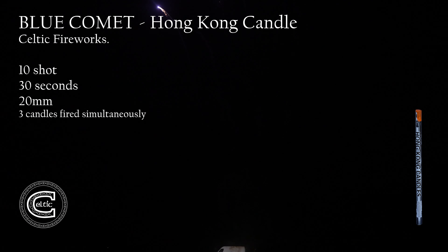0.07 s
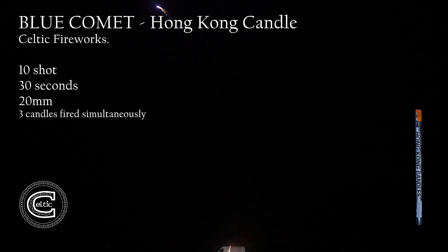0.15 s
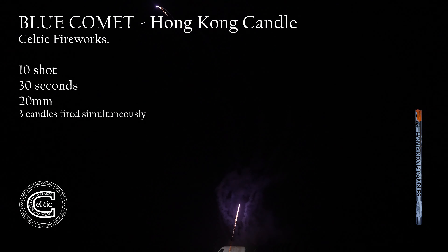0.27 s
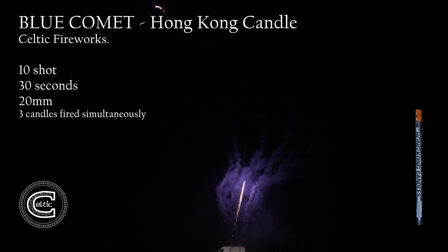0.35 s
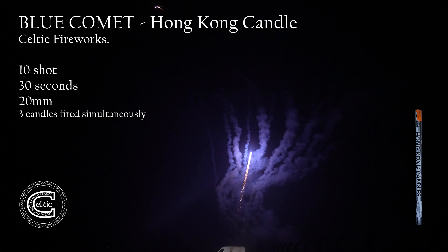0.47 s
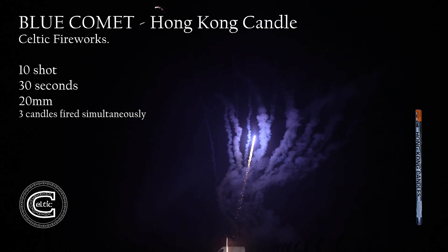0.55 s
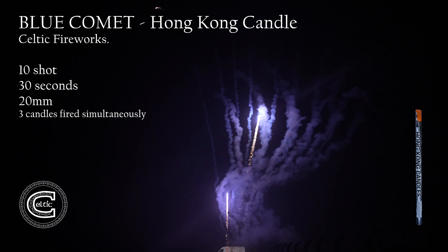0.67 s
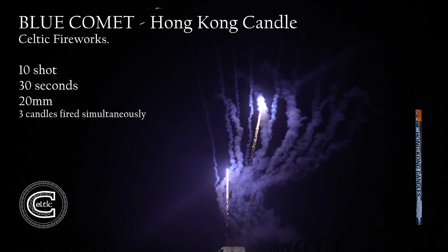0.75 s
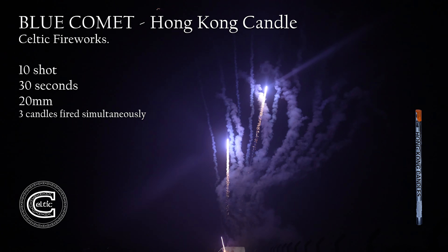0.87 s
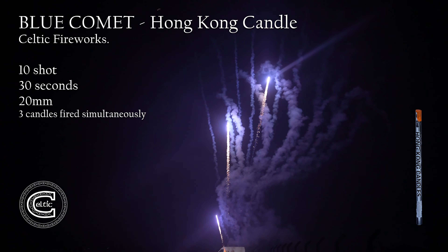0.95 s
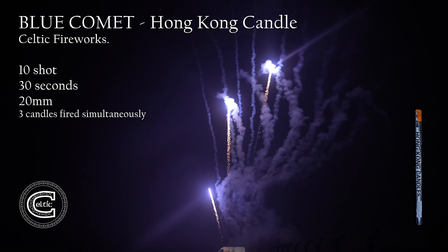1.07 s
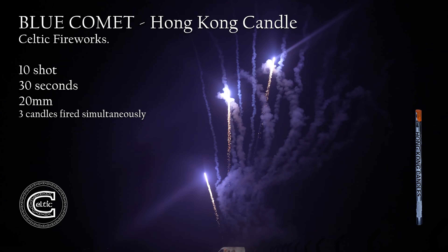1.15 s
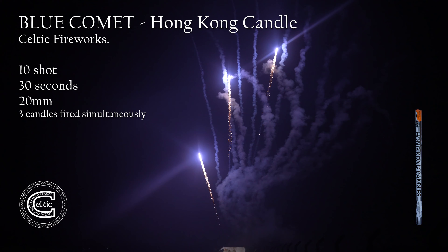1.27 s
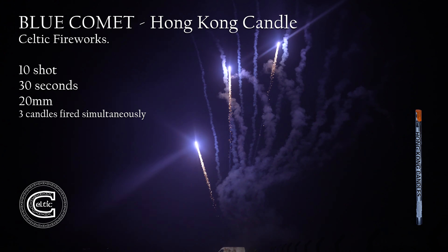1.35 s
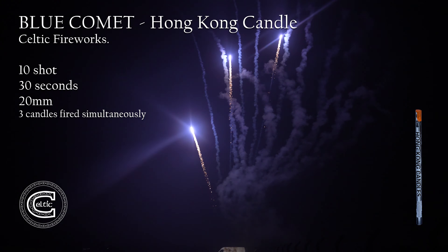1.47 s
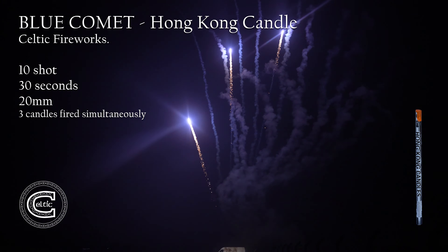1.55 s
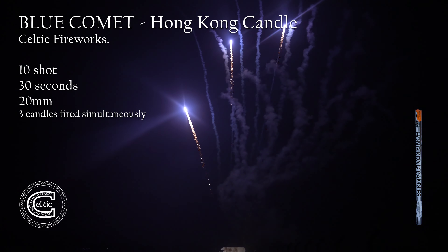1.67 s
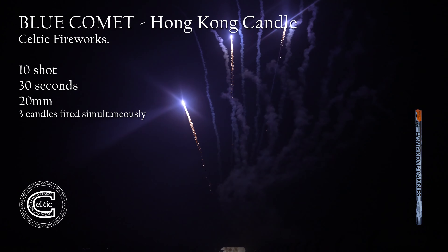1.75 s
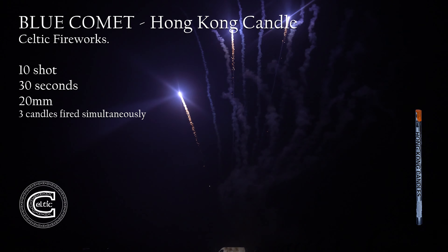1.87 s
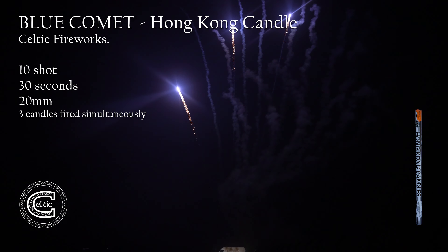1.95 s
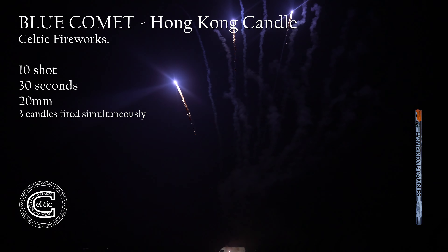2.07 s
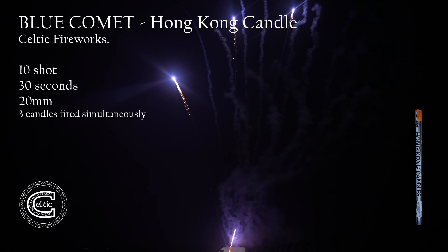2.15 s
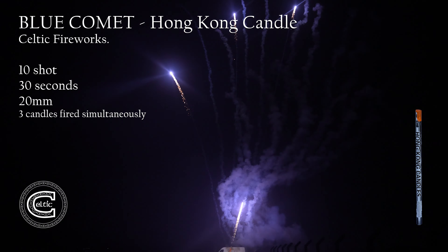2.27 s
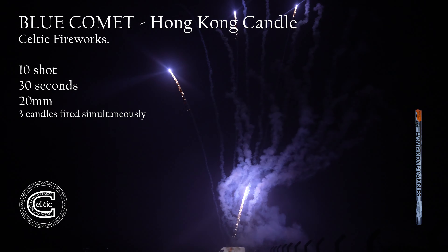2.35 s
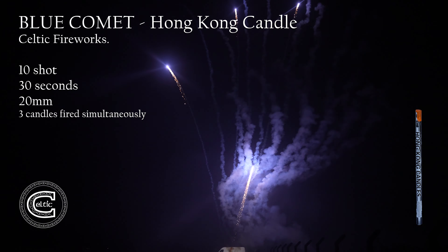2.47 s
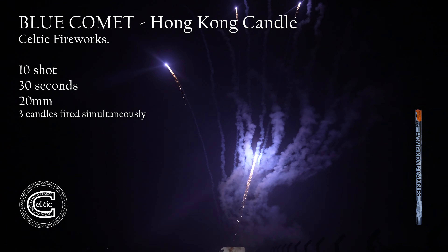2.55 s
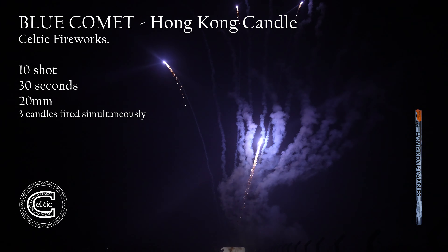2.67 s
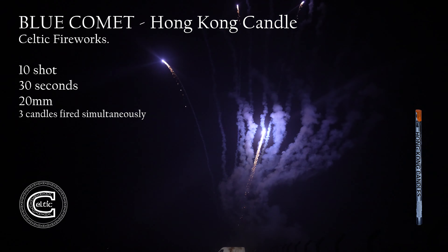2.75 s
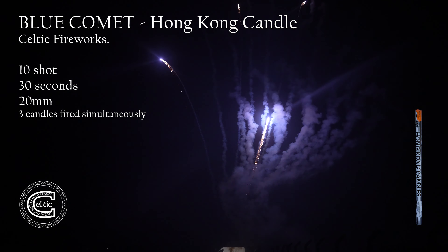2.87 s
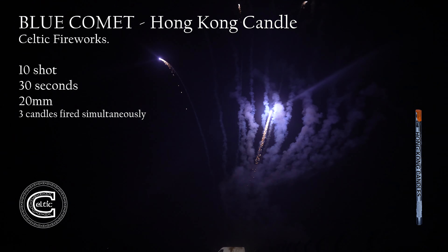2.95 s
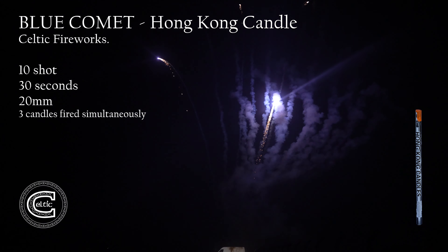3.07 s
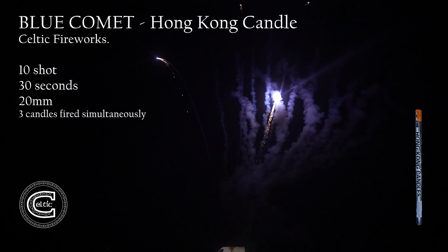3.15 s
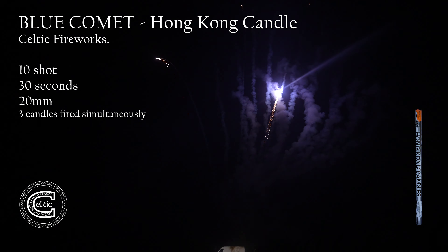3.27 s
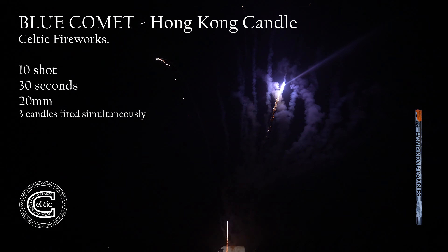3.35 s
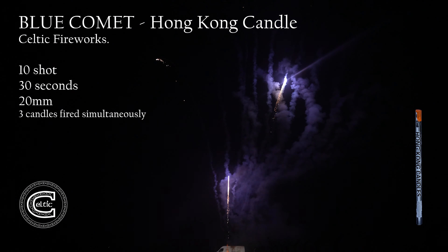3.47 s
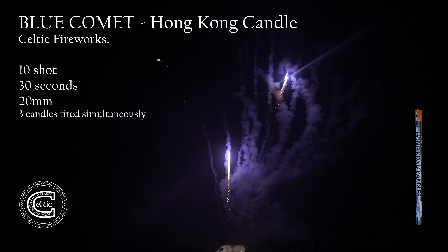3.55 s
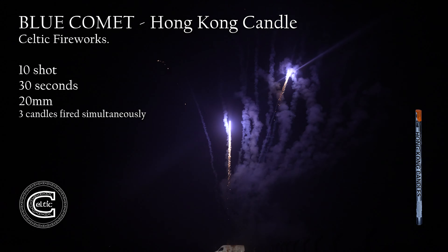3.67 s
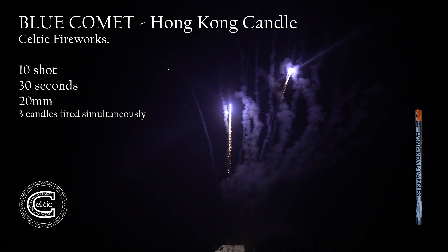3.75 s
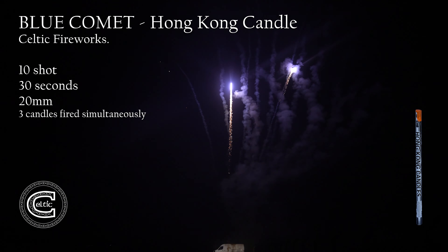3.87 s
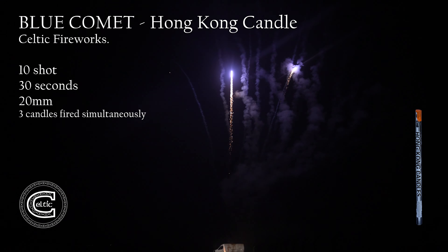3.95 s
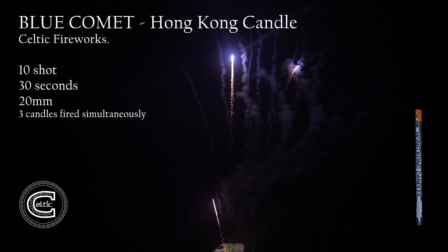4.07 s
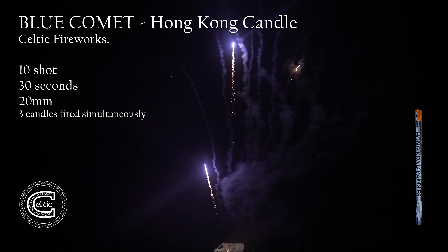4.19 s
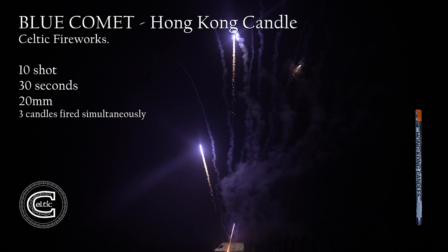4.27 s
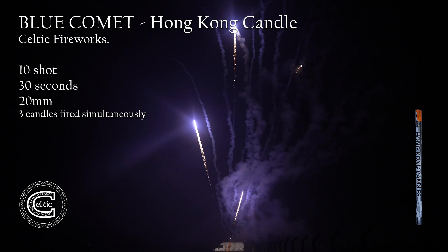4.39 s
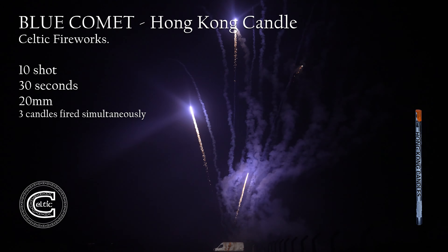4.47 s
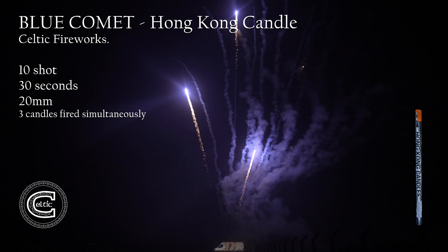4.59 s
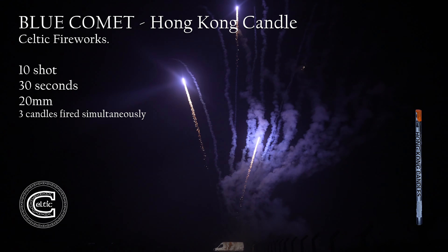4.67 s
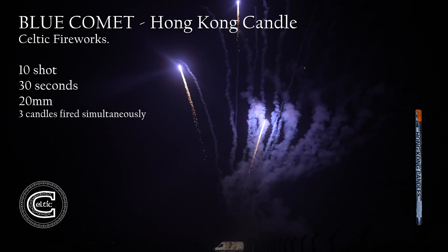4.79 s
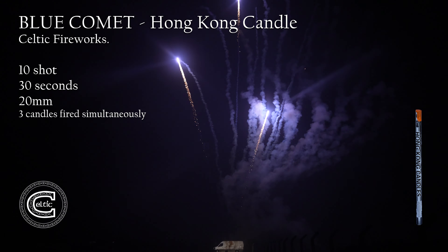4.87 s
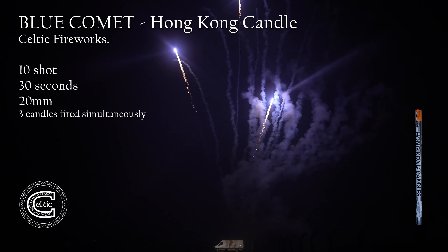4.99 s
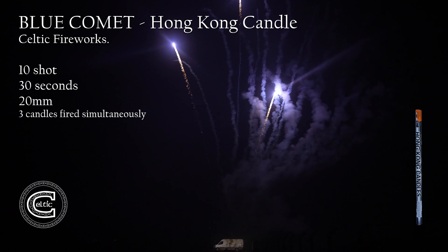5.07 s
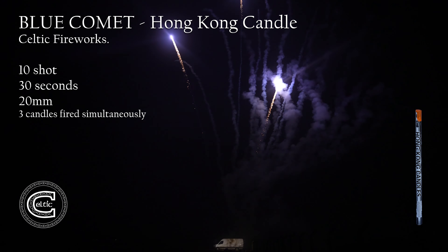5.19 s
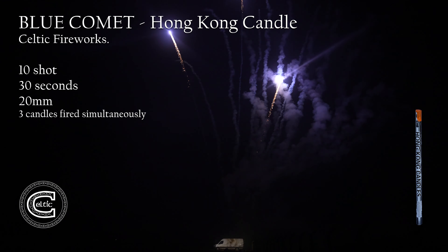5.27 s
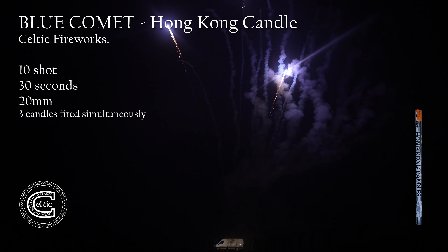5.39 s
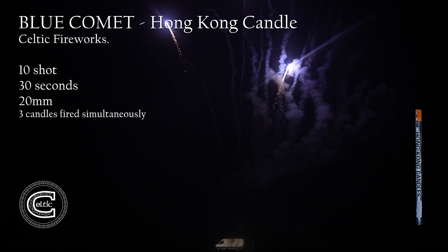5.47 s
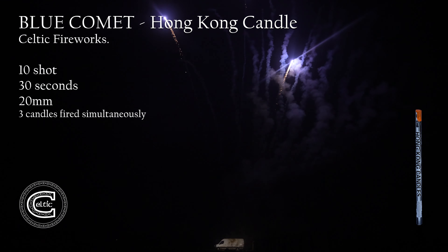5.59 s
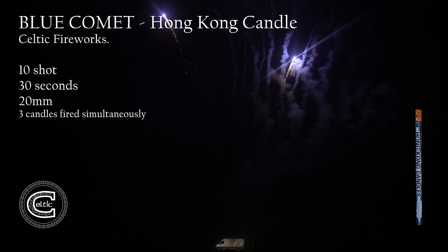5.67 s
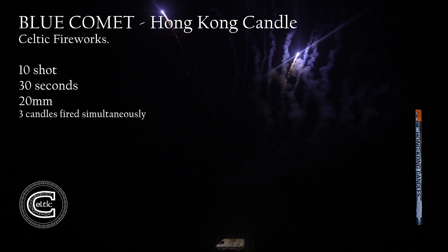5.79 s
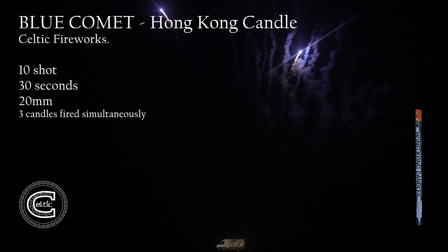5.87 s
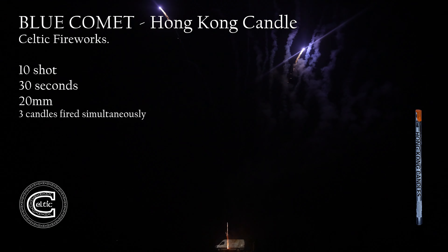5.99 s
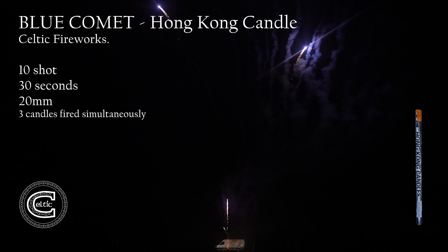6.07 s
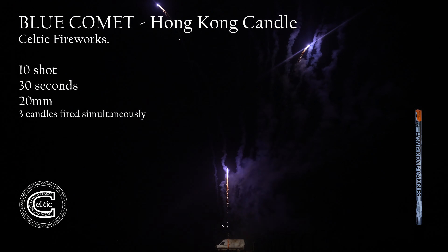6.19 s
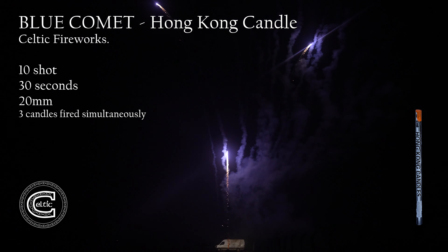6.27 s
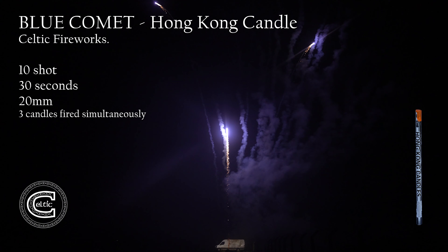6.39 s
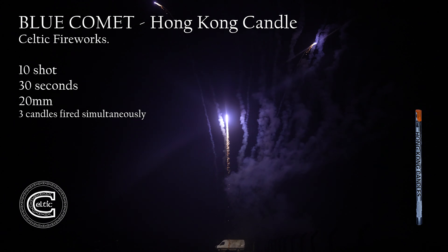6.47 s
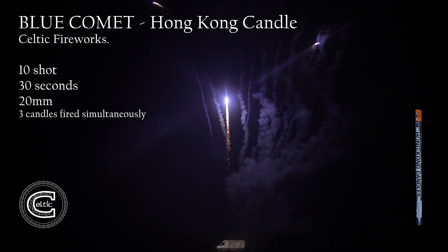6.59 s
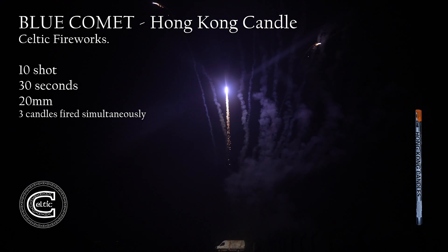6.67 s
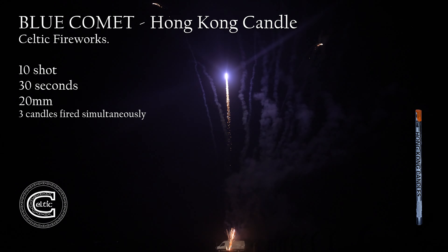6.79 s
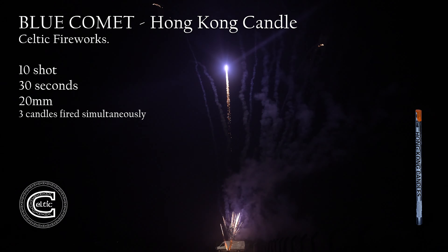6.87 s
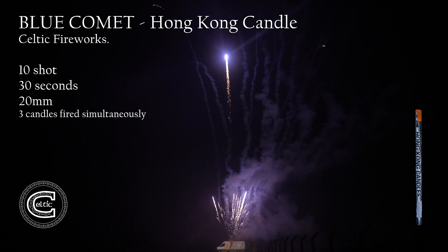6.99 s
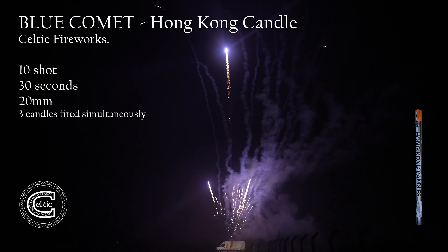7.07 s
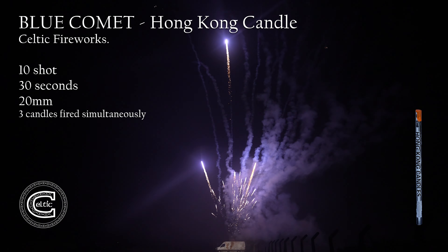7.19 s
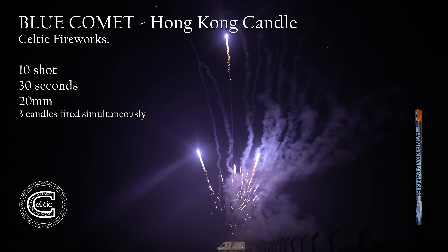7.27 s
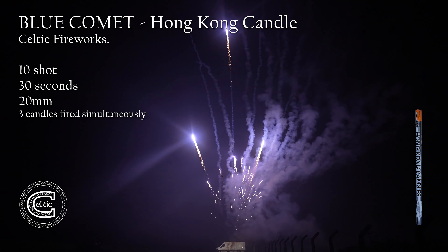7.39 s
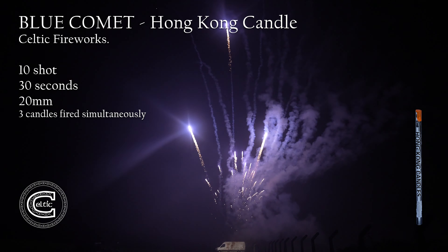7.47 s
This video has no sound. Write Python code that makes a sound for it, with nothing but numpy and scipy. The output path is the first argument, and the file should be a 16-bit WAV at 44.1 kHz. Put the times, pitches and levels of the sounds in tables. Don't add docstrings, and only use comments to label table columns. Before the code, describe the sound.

Mono outdoor night sound, with a microphone near enough to be overloaded by the shots. Faint low traffic rumble and a soft fuse fizz open the scene. At 0.4 s a hard double-edged bang cracks out, followed by others at 0.8 and 1.1 s, their echoes overlapping. Each has a dry snap, a short thump, an immediate slap from a wall, and a diffuse wash returning about a quarter second later and fading over a second or so. Climbing stars fizz thinly. A lone bang comes at 2.3 s, then shots at 3.6, 4.2 and 4.5 s, the last of these slightly weaker. Quiet hum and fading fizz follow, with one tiny tick near 5.4 s. Another bang lands at 6.2 s. Small puffs from 6.9 s lead into a ripping cluster of cracks at 7.0-7.1 s, then a lumpy, crackling roar rolls back from 7.25 s and dies away.

```python
import sys
import numpy as np
from scipy import signal
from scipy.fft import rfft, irfft, next_fast_len
from scipy.io import wavfile
from scipy.ndimage import uniform_filter1d

SR = 44100
rng = np.random.default_rng(int(sys.argv[2]) if len(sys.argv) > 2 else 0)


def wav_record(signal):
    frames = np.transpose(np.atleast_2d(signal))
    bounded = np.clip(frames, -1, 1)
    quanta = np.round(bounded * 32767).astype(np.int16)
    wavfile.write(sys.argv[1], SR, quanta)


def volts_from_decibels(level):
    exponent = np.asarray(level, float) / 20
    return 10 ** exponent


N = 332056


def evened(x):
    return x / np.sqrt(np.mean(x ** 2) + 1e-30)


def add(mix, start_s, sound):
    part = mix[round(start_s * SR):][:len(sound)]
    part += sound[:len(part)]


def coloured(x, spectrum):
    hz, db = np.transpose(spectrum)
    size = next_fast_len(len(x))
    grid = np.fft.rfftfreq(size, 1 / SR)
    gain = volts_from_decibels(np.interp(np.log(grid + 1), np.log(hz), db, -90, -90))
    return evened(irfft(rfft(x, size) * gain, size)[:len(x)])


def lumpy(length, spectrum, lump_db, lump_s):
    arrivals, lumps = rng.standard_normal((2, length))
    wander = evened(uniform_filter1d(lumps, round(lump_s * SR)))
    return coloured(arrivals * volts_from_decibels(lump_db * wander), spectrum)


def swell(t, db, build_s, hold_s, fall_db):
    t = np.maximum(t, 0)
    build = 1 - np.exp(-(t / build_s) ** 2)
    return build * volts_from_decibels(db - fall_db * np.maximum(t - hold_s, 0))


def blast(db, stretch, rise_s, dies_s):
    t = np.arange(1600) / SR / stretch
    swings = np.sin(np.pi * (t / 0.001011) ** 0.557) * np.exp(-(t / dies_s) ** 2)
    heave = 0.018 * np.hanning(len(t))
    return volts_from_decibels(db) * (swings + heave) * (1 - np.exp(-(t / rise_s) ** 2))


def crack(db, length_ms, spectrum):
    u = np.arange(1600) / SR / (0.00028 * length_ms)
    envelope = u * np.exp(1 - u)
    sound = lumpy(4096, spectrum, 2.0, 0.0011)[:1600] * envelope
    return volts_from_decibels(db) * sound / np.sqrt(np.sum(sound ** 2) / np.sum(envelope ** 2))


def lead_in(db, rumble, hiss):
    to_go = np.arange(len(rumble))[::-1] / SR
    growth = np.exp(-(to_go / 0.0077) ** 3) + 0.057 * np.exp(-to_go / 0.029)
    return volts_from_decibels(db) * (rumble + 0.15 * hiss) * growth


# [t/s, blast level/dB, blast stretch/1, crack level/dB, lead-in level/dB]
REPORTS = [(0.4147, -6.5, 0.83, -9.5, -34), (0.4169, -1.5, 0.835, -9.5, -62.5), (0.8021, 0, 1.056, -7, -43),
           (1.0968, -21, 0.66, -22, -21.5), (1.0981, -2.5, 1.025, -16, -61), (2.341, -3.5, 0.908, -20, -25),
           (3.5711, -0.5, 0.95, -8.5, -30), (4.2235, 1.5, 0.953, -8, -27), (4.4774, -8, 1.09, -15, -31.5),
           (6.2077, -1.5, 0.982, -14, -25.5), (7.005, -7.5, 1.08, -13.5, -26.5),
           (7.0165, -7, 0.58, -5, -29), (7.0321, -6.5, 0.57, -11.5, -14), (7.071, -3.5, 0.9, -15.5, -17)]
# [f/Hz, level/dB per Hz]
CRACK_SPECTRUM = [(300, -22), (1000, 3), (1900, -0.5), (2900, 5.5), (3800, 3.5), (5000, -12.5),
                  (7000, -24.5), (12000, -24), (16500, -44)]
# [f/Hz, level/dB per Hz]
GRUMBLE_SPECTRUM = [(150, -17.5), (260, -4), (380, -3), (650, -12.5), (1100, -23.5)]
# [f/Hz, level/dB per Hz]
STAR_SPECTRUM = [(300, -20), (1000, 5), (2000, -6), (3700, -5.5), (4700, -18), (5900, -14.5), (12000, -28),
                 (15000, -42), (16600, -62.5)]
STRAIGHT_PUSH_DB, STRAIGHT_CRACK_DB = 12.5, 2.5
SCATTERED_CRACK_DB = 11


def fire_shots(straight, outward, low, high):
    for s, blast_db, stretch, crack_db, lead_db in REPORTS:
        tear = crack(crack_db, 3.76, CRACK_SPECTRUM)
        rumble = lumpy(2048, GRUMBLE_SPECTRUM, 0.42, 0.00067)
        lead = lead_in(lead_db, rumble, lumpy(2048, STAR_SPECTRUM, 1.3, 0.0015))
        push = blast(blast_db + STRAIGHT_PUSH_DB, 0.926 * stretch, 0.00012, 0.0031)
        add(straight, s, push + volts_from_decibels(STRAIGHT_CRACK_DB) * tear)
        add(outward, s, blast(blast_db + 0.31, 1.027 * stretch, 0.00052, 0.0062) + tear)
        lead_s = s - 2048 / SR
        add(straight, lead_s, volts_from_decibels(3.0) * lead)
        add(outward, lead_s, volts_from_decibels(-3.5) * lead)
        add(low, s, volts_from_decibels(blast_db) * np.ones(1))
        add(high, s, volts_from_decibels(crack_db + SCATTERED_CRACK_DB) * np.ones(1))


# [t/s, level/dB, length/ms]
STAR_TEARS = [
    (7.0163, -3, 4.6),
    (7.0330, -17, 7.2),
]
# [f/Hz, level/dB per Hz]
TREE_SPECTRUM = [(300, -17), (480, 0), (750, -1.5), (1100, 2), (1600, 1.5), (2400, -8.5), (3800, -11.5),
                 (5500, -26)]


def tear_stars(straight, outward):
    for s, db, length_ms in STAR_TEARS:
        tear = crack(db, length_ms, TREE_SPECTRUM)
        add(straight, s, tear)
        add(outward, s, tear)


# [t/s, level/dB, stretch/1, spit level/dB]
LIFT_PUFFS = [
    (0.358, -44, .9, -76),
    (2.314, -43, 1.1, -62),
    (3.543, -55.5, 0.95, -60),
    (4.187, -35, 0.27, -58),
    (6.898, -36, 1, -61),
    (6.936, -29.5, 0.88, -56),
    (6.968, -24.5, 0.83, -42.5),
    (6.973, -15.5, 0.96, -52),
    (6.983, -18, 0.79, -42),
]


def puff_charges(straight, outward, low):
    for s, db, stretch, spit_db in LIFT_PUFFS:
        puff = blast(db, stretch, 0.00042, 0.0033) + crack(spit_db, 6.4, CRACK_SPECTRUM)
        add(straight, s, volts_from_decibels(2.5) * puff)
        add(outward, s, puff)
        add(low, s, volts_from_decibels(db) * np.ones(1))


def candles():
    straight, outward, low, high = np.zeros((4, N))
    fire_shots(straight, outward, low, high)
    tear_stars(straight, outward)
    puff_charges(straight, outward, low)
    return straight, outward, low, high


# [t/s, level/dB]
SHOCK_FRONTS = [(.4168, -14), (0.802, -16), (1.0987, -24), (2.341, -29), (3.5711, -7), (4.2237, -18),
                (4.477, 3), (6.2076, -28), (7.0063, -14), (7.0163, -12), (7.061, -14)]


def snaps():
    out = np.zeros(N)
    u = np.arange(100) / SR / 0.00003
    for s, db in SHOCK_FRONTS:
        add(out, s, volts_from_decibels(db) * (1 - u) * np.exp(-u))
    return out


# [delay t/s, level/dB, sign/1, low edge f/Hz, high edge f/Hz]
REFLECTORS = [(.0088, -13.5, 1, 402, 2450), (0.0113, -16.5, 1, 395, 2000), (0.0153, -22.5, 1, 400, 2034),
              (0.0152, -15.5, 1, 252.5, 2950), (.0200, -13, 1, 342, 1846), (.0230, -15.5, 1, 354, 1620),
              (0.0263, -17, 1, 300, 1610), (0.034, -20, 1, 300, 1840), (0.0433, -5, 1, 44.9, 5980),
              (0.0569, -23, -1, 30.2, 893), (0.0822, -34, -1, 60, 893), (0.1147, -25, 1, 100.5, 912),
              (0.1267, -30, 1, 50, 700), (0.2172, -23, 1, 184, 780), (0.2432, -30.5, 1, 900, 4500),
              (.2610, -33.5, 1, 201.5, 2500), (0.3624, -41, 1, 59.4, 1800), (.4000, -41, -1, 59.8, 694),
              (0.4157, -44.5, 1, 60.7, 702), (0.4692, -35, -1, 60.1, 700), (0.6165, -30, 1, 60, 2780)]


def reflections():
    path, click = np.zeros(SR), np.eye(1, 2000)[0]
    for delay, db, sign, low_hz, high_hz in REFLECTORS:
        thinned = signal.lfilter(*signal.butter(1, low_hz, "high", fs=SR), click)
        dulled = signal.lfilter(*signal.butter(2, high_hz, fs=SR), thinned)
        add(path, delay, np.sign(sign) * volts_from_decibels(db) * dulled)
    return path


# [level/dB, build-up t/s, hold t/s, fall/dB per s]
YARD_BELT = [
    (-20, 0.014, 0.01, 1101.5),
    (-16.5, 0.0056, 0.0088, 602),
    (-28, 0.0033, 0.0045, 900),
    (-45, 0.0027, 0.0035, 198),
]
HEDGE_BELT = [
    (-29, .008, 0.015, 122),
    (-44, 0.016, 0.042, 58),
    (-38.5, 0.0061, 0.055, 480),
    (-55, .008, 0.061, 800),
]
TREE_BELT = [
    (-41.5, 0.099, 0.31, 21),
    (-45.5, 0.12, 0.25, 12.5),
    (-47.5, 0.022, .03, 12.7),
    (-73, 0.026, .03, 14),
]
OPEN_GROUND = [
    (-47.5, .05, 0.11, 40),
    (-54, .05, .1, 35),
    (-53.5, .05, 0.1, 42),
    (-72.5, .05, 0.13, 36),
]
YARD_S, HEDGE_S, TREE_LINE_S = 0.0024, 0.032, 0.24


def fading(row):
    t = np.arange(2 * SR) / SR
    spread = np.minimum(TREE_LINE_S / (t + 1e-9), 1)
    yard = swell(t - YARD_S, *YARD_BELT[row])
    hedge = swell(t - HEDGE_S, *HEDGE_BELT[row])
    ground = swell(t, *OPEN_GROUND[row])
    trees = spread * swell(t - TREE_LINE_S, *TREE_BELT[row])
    return np.sqrt(yard ** 2 + hedge ** 2 + ground ** 2 + trees ** 2)


# [f/Hz, level/dB per Hz]
BOOM_SPECTRUM = [(25, -39.5), (60, -4.5), (150, 1), (260, -4.5), (500, -26.5)]
BODY_SPECTRUM = [(150, -2), (280, 3), (500, -2), (900, -10), (1500, -48)]


def low_scatter(train):
    boom = lumpy(2 * SR, BOOM_SPECTRUM, 3.0, 0.008) * fading(0)
    body = lumpy(2 * SR, BODY_SPECTRUM, 2.9, 0.0052) * fading(1)
    return signal.fftconvolve(train, boom + body)[:N]


# [f/Hz, level/dB per Hz]
HISS_SPECTRUM = [(600, -21), (1100, -1), (1900, -5), (2900, -4.5), (3900, -3), (5000, -15), (7000, -70)]
SIZZLE_SPECTRUM = [(3500, -19), (5500, 3), (8000, -4), (12500, -21), (15000, -29), (16600, -48.5)]


def high_scatter(train):
    def level(row):
        power = signal.fftconvolve(train ** 2, fading(row) ** 2)[:N]
        return np.sqrt(abs(power))

    hiss = level(2) * lumpy(N, HISS_SPECTRUM, 1.7, 0.015)
    sizzle = level(3) * lumpy(N, SIZZLE_SPECTRUM, 1.1, 0.003)
    return hiss + sizzle


# [t/s, peak level/dB]
ROAR_CLUMPS = [(7.26, -34), (7.277, -23), (7.286, -37), (7.301, -37), (7.315, -21.5), (7.323, -25),
               (7.358, -21), (7.376, -28), (7.412, -22), (7.423, -19), (7.444, -20.5), (7.46, -22)]


def roar():
    level = swell(np.arange(N) / SR - 7.253, -35.5, build_s=0.04, hold_s=0.26, fall_db=88)
    out = lumpy(N, TREE_SPECTRUM, 3.5, 0.012) * level
    for s, db in ROAR_CLUMPS:
        add(out, s, crack(db - 10.5, 7.0, TREE_SPECTRUM))
    return out


# [launch t/s, level/dB]
STAR_CLIMBS = [(.416, -54.5), (.802, -52), (1.098, -56), (2.341, -55), (3.571, -53), (4.224, -54.5),
               (4.477, -54.5), (6.208, -54), (7.01, -46)]
# [ends at
# t/s, level/dB, growth/dB per s]
FUSES_AND_SWELLS = [(.414, -62, 150), (.802, -41, 1500), (2.34, -59.5, 58), (3.57, -55.5, 252), (4.224, -56, 600),
                    (6.195, -68, 75), (6.207, -46, 1500), (7.0, -59, 63), (3.571, -50, 1500)]
# [f/Hz, level/dB per Hz]
FUSE_SPECTRUM = [(1500, -25), (2400, 0), (3300, 0.5), (5500, -12), (7500, -10), (8500, -19), (12000, -45)]
# [t/s, level/dB, f/Hz, length/ms]
SPARK_TICKS = [
    (.25, -58, 3370, 3),
    (5.402, -53, 7500, .5),
]


def stars():
    t = np.arange(N) / SR
    climb_power = sum(swell(t - s, db, build_s=0.17, hold_s=0.39, fall_db=21) ** 2 for s, db in STAR_CLIMBS)
    fuse_level = sum((t < s) * volts_from_decibels(db - growth * abs(s - t)) for s, db, growth in FUSES_AND_SWELLS)
    out = lumpy(N, STAR_SPECTRUM, 1.4, 0.007) * np.sqrt(climb_power)
    out += lumpy(N, FUSE_SPECTRUM, 1.5, 0.006) * fuse_level
    for s, db, hz, length_ms in SPARK_TICKS:
        tick_t = np.arange(0, length_ms / 1000, 1 / SR)
        tick = np.sin(2 * np.pi * hz * tick_t) * np.hanning(len(tick_t))
        add(out, s - 0.003, volts_from_decibels(db) * tick)
    return out


def drone(hz, width_hz):
    turn = np.exp(2j * np.pi * hz * np.arange(N) / SR)
    r = np.exp(-np.pi * width_hz / SR)
    pole = [1, -2 * r, r * r]
    return evened((turn * signal.lfilter([1], pole, rng.standard_normal(N) / turn)).real)


# [f/Hz, level/dB per Hz]
NIGHT_SPECTRUM = [(15, -23.5), (25, 3), (71, -1.5), (538, -24.5), (1600, -31.5), (3680, -29), (4900, -38),
                  (11800, -53.5)]
NIGHT_DB = -53


def night():
    wash = volts_from_decibels(NIGHT_DB - 3) * coloured(rng.standard_normal(N), NIGHT_SPECTRUM)
    engine = volts_from_decibels(-58) * drone(71.3, width_hz=22)
    tyres = volts_from_decibels(-73.5) * drone(919, width_hz=220)
    return wash + engine + tyres


def scene():
    straight, outward, low, high = candles()
    shots = signal.lfilter(*signal.butter(1, 90, "high", fs=SR), straight)
    shots += signal.fftconvolve(outward, reflections())[:N]
    shots += low_scatter(low) + high_scatter(high)
    return (shots + snaps() + roar() + stars() + night())[None]


def low_pass(x):
    return signal.sosfilt(signal.butter(12, 16800, fs=SR, output="sos"), x)


def record(dry):
    ceiling, coupling_hz, edge_hz = 0.37, 28.6, 16200
    clipped = np.clip(dry, -ceiling, ceiling)
    tilted = signal.lfilter(*signal.butter(1, coupling_hz, "high", fs=SR), clipped)
    lowpass = signal.firwin(127, edge_hz, window=("kaiser", 8), fs=SR)
    limited = signal.oaconvolve(tilted, lowpass[None], "same")
    return low_pass(limited)


dry = scene()
out = record(dry)
wav_record(out)
```